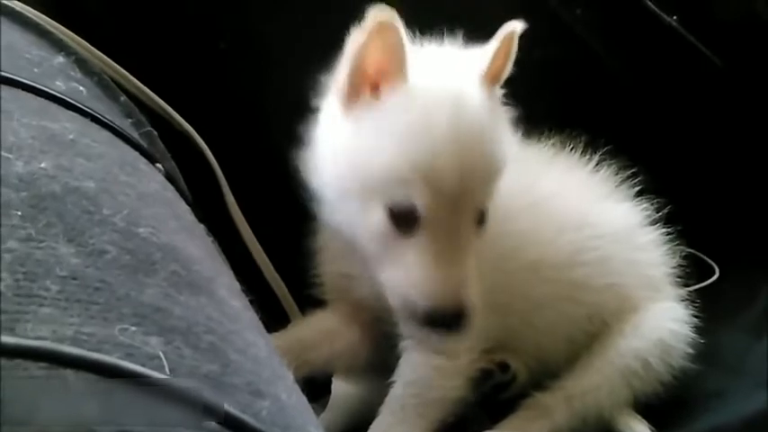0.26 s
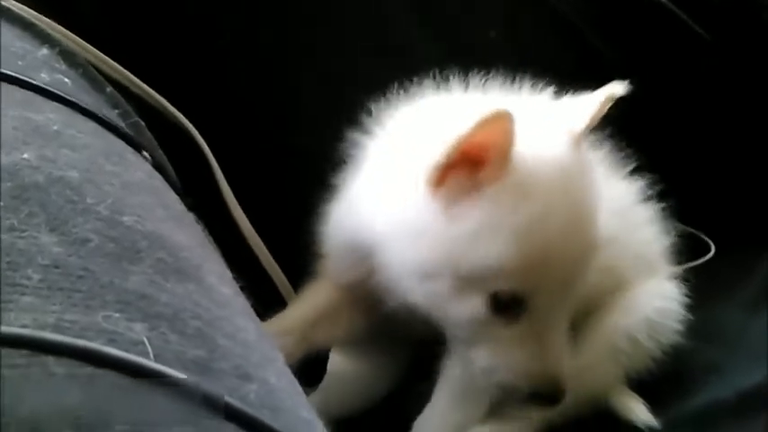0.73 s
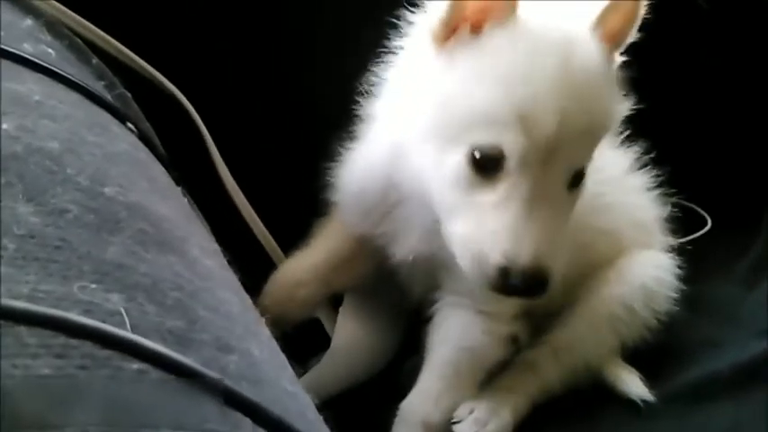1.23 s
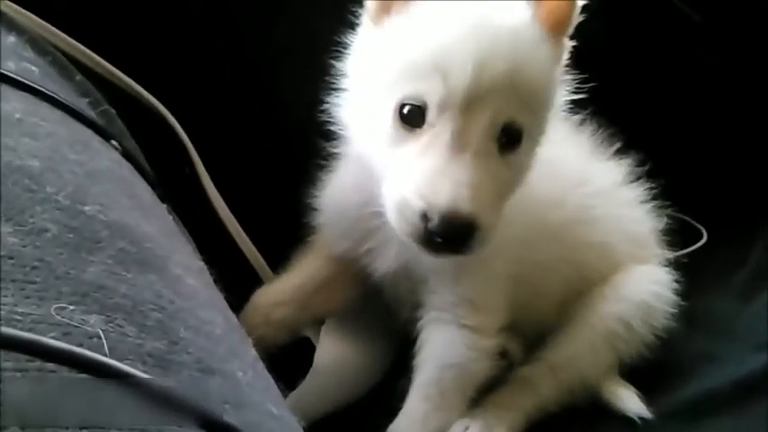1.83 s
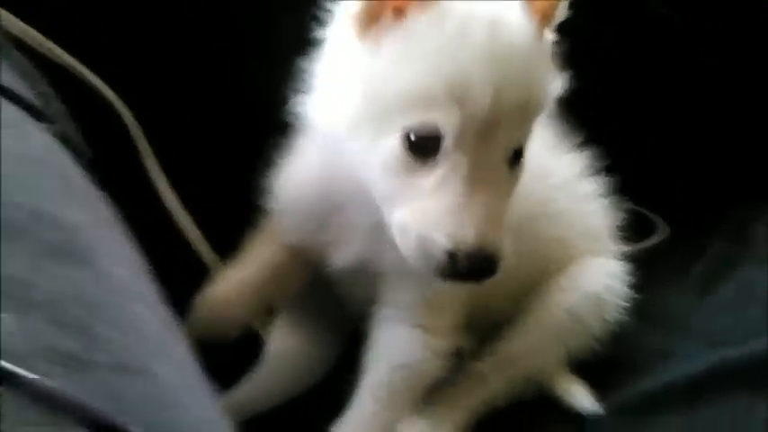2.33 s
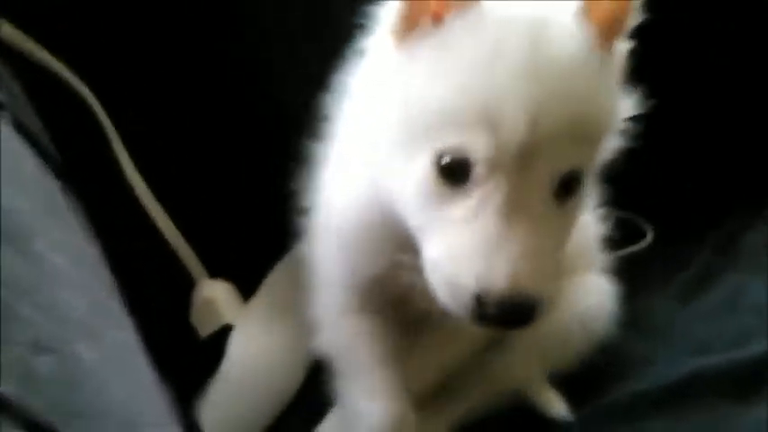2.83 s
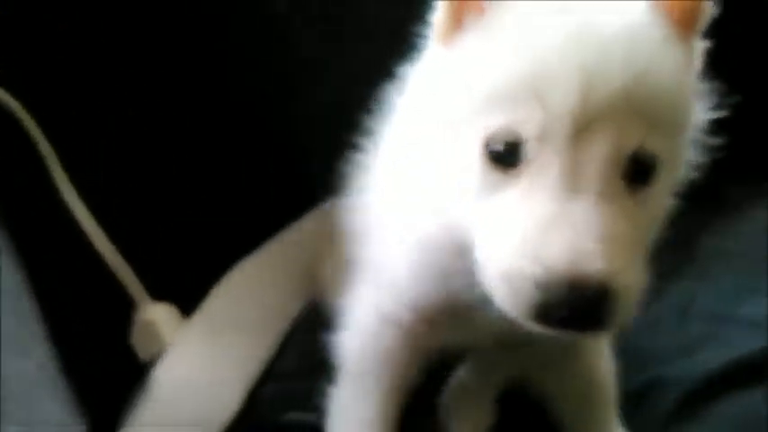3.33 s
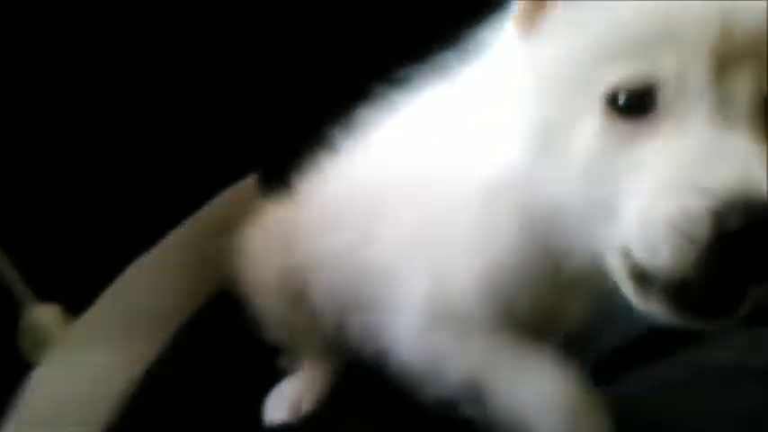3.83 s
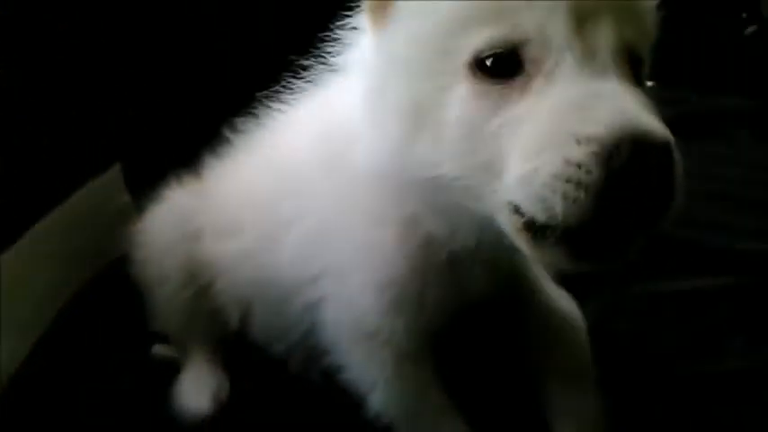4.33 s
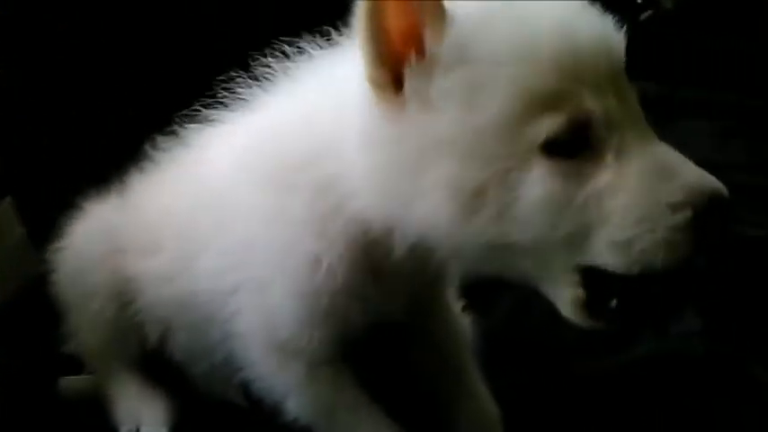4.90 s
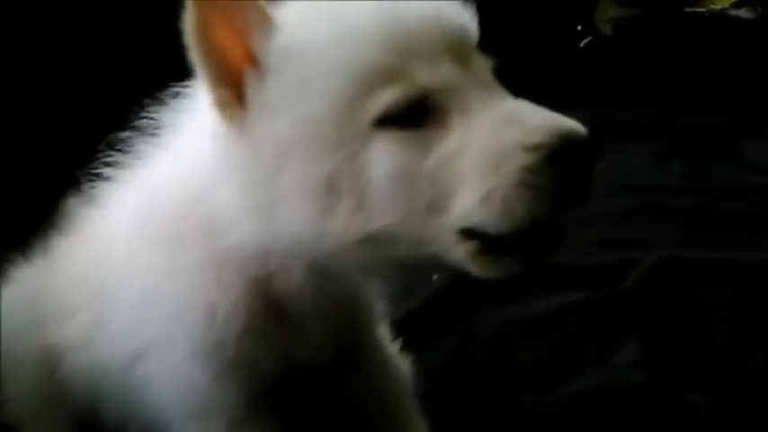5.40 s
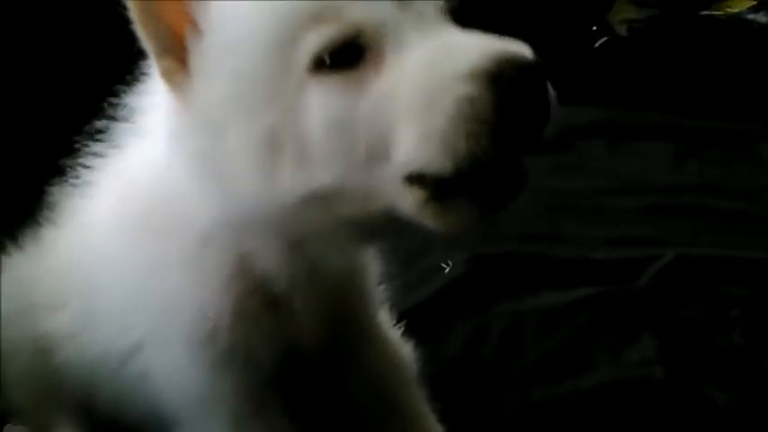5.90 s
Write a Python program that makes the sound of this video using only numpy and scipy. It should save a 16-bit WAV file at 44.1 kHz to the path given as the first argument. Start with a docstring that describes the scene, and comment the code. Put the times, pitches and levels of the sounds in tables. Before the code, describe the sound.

A wolf pup shuffles softly on cloth with small clicks, then gives one trembling call that leaps into a yelp and slides down as a howl.

```python
"""Wolf pup: shuffling, then a howl

A wolf pup shuffles about on cloth, close by in a quiet, dead-sounding space: tiny random slips make the rub,
short noise bursts the clicks and paw falls. Then comes one long call: a quivering hum through the nose,
an open-mouthed moan, a leap into a cracking yelp, and a clear howl that slides down as the mouth closes.
The voice is a stack of harmonics shaped by a moving throat, with a rasp of air at every pulse.
"""
import sys
import numpy as np
from scipy import signal
from scipy.fft import rfft, irfft, next_fast_len
from scipy.io import wavfile
from scipy.ndimage import uniform_filter1d, map_coordinates

SR = 44100
rng = np.random.default_rng(int(sys.argv[2]) if len(sys.argv) > 2 else 0)


def generate_wav(sig):
    """Save sig (samples, or channels by samples) to the path in sys.argv[1] as 16-bit PCM at SR."""
    pcm = np.round(np.clip(np.atleast_2d(sig).T, -1, 1) * 32767).astype(np.int16)
    wavfile.write(sys.argv[1], SR, pcm)


N = 271425
TIME = np.arange(N) / SR  # s
EDGE_HZ = 15550  # upper limit of the whole sound


def amp(db):
    """Turns decibels into a gain."""
    return 10 ** (np.asarray(db) / 20)


def unit(x):
    """Scales a sound to an average (rms) level of 1."""
    return x / np.sqrt(np.mean(x ** 2) + 1e-20)


def curves(rows, t):
    """Reads the columns of a table at the times t, with straight lines between rows."""
    start_s, *columns = np.transpose(rows)
    return [np.interp(t, start_s, column) for column in columns]


def spectrum_db(points, hz):
    """Reads a spectrum with straight lines on a log-frequency axis."""
    f, db = np.transpose(points)
    return np.interp(np.log(hz + 1), np.log(f + 1), db)


def colour(x, points):
    """Weights a sound by a spectrum, at rms 1; only the differences between the dB values count."""
    size = next_fast_len(len(x))
    gain = amp(spectrum_db(points, np.fft.rfftfreq(size, 1 / SR)))
    return unit(irfft(rfft(x, size) * gain, size)[:len(x)])


def drift(count, hz):
    """Random wandering, hardly any of it much faster than hz, at rms 1."""
    size = next_fast_len(count)
    f = np.fft.rfftfreq(size, 1 / SR)
    return unit(irfft(rfft(rng.standard_normal(size)) * np.exp(-(f / hz) ** 2), size)[:count])


# Tone of the room's steady noise: pitch_hz, relative_db
ROOM_TONE = [(12, -54), (20, 2), (90, -10.5), (112, -11.5), (175, -1), (218, -8), (476, -12.5), (578, -14),
             (1040, -11), (3520, -31), (6310, -32.5), (7260, -31), (9060, -45), (12300, -28), (15400, -27)]
ROOM_DB = -50
DRONE_HZ, DRONE_DB = 175, -67


def room():
    """Low steady noise, plus a faint drone whose pitch and loudness waver at random."""
    drone_hz = DRONE_HZ + 4 * drift(N, 14.5)
    drone_swell = 1 + 0.56 * drift(N, 0.91)
    drone = unit(np.sin(2 * np.pi * np.cumsum(drone_hz) / SR) * drone_swell)
    hiss = colour(rng.standard_normal(N), ROOM_TONE)
    return amp(ROOM_DB) * hiss + amp(DRONE_DB) * drone


# Early echoes from the surfaces close around the pup: delay_s, level_db
ECHOES = [(.0042, -39), (.0085, -30)]


def reflections(x, wet_db=-32, t60=0.21):
    """Close, soft surroundings return early echoes and a faint, dull tail that falls 60 dB in t60 seconds."""
    t = np.arange(SR // 4) / SR
    tail_tone = [(200, -6), (1000, 17.0), (2200, -7), (4000, -33), (15000, -53)]  # pitch_hz, relative_db
    tail = colour(rng.standard_normal(len(t)), tail_tone)
    tail *= amp(-60 * t / t60) * (t > .003)
    tail /= np.linalg.norm(tail)
    early = sum(amp(db) * np.interp(TIME - delay_s, TIME, x) for delay_s, db in ECHOES)
    return early + amp(wet_db) * signal.oaconvolve(x, tail)[:N]


# Tone of the light swish: pitch_hz, relative_db
SWISH_TONE = [(2060, -67), (3500, -40), (4580, -30), (4800, -30), (6670, -9.5), (7270, -6.5), (8780, 1.5),
              (10100, -1.5), (13900, -28), (15000, -33)]
# Tone of the heavier scrape: pitch_hz, relative_db
SCRAPE_TONE = [(1200, -5.5), (2400, -14), (3600, -2.5), (5000, -1), (7000, -6.5), (11000, -39)]
# Fur and paws slide on cloth, one row a stroke: peak_s, swell_s, fade_s, swish_db, scrape_db
STROKES = [(.65, 0.1, 0.088, -44, -59), (.96, 0.077, 0.089, -31.5, -59), (1.21, 0.024, 0.057, -42, -61),
           (1.38, .13, .13, -47.5, -61.5), (1.55, 0.054, 0.066, -46, -62), (1.74, 0.11, 0.091, -46.5, -69),
           (1.92, 0.082, 0.18, -50, -73), (2.33, 0.069, 0.09, -46, -58.5), (2.51, 0.076, 0.042, -36, -56.5),
           (2.692, 0.04, 0.017, -30.5, -43.5), (2.76, 0.036, 0.023, -37, -48.5),
           (2.96, 0.21, 0.11, -46, -52), (3.53, 0.23, 0.11, -40, -45.5), (3.79, 0.081, 0.093, -48.5, -53.5)]
STROKE_SHAPE = 1.28  # between a pointed (1) and a rounded (2) peak
REST_SWISH_DB, REST_SCRAPE_DB = -59.5, -66.5  # between strokes the fur never lies quite still


def rubbing(fibres_per_s=9000, uneven_db=0.78, catches_per_s=6, catch_size=9):
    """Thousands of tiny fibre slips a second under each stroke; now and then a fibre catches and ticks."""
    swish, scrape = amp(REST_SWISH_DB), amp(REST_SCRAPE_DB)
    for peak_s, swell_s, fade_s, swish_db, scrape_db in STROKES:
        width_s = np.where(TIME < peak_s, swell_s, fade_s)
        speed = np.exp(-(abs(TIME - peak_s) / width_s) ** STROKE_SHAPE)
        # noises add by power, not by height
        swish = np.hypot(swish, amp(swish_db) * speed)
        scrape = np.hypot(scrape, amp(scrape_db) * speed)
    slips = rng.standard_normal(N) * (rng.random(N) < fibres_per_s / SR)
    slips += catch_size * rng.random(N) * (rng.random(N) < catches_per_s / SR)
    # the rubbing fades to nothing early in the call
    pressure = amp(uneven_db * drift(N, 60)) * np.interp(TIME, [3.8, 3.95], [1, 0])
    return pressure * (colour(slips, SWISH_TONE) * swish + colour(slips, SCRAPE_TONE) * scrape)


def burst(start_s, db, t60, sound, rise):
    """A short contact with no ring: noise that rises fast and dies away by 60 dB in t60 seconds."""
    start = round(start_s * SR)
    age = np.arange(len(sound)) / SR
    out = np.zeros(N)
    out[start:start + len(sound)] = sound * amp(db - 60 * age / t60) * (1 - np.exp(-age / rise))
    return out


# Soft paw falls: start_s, level_db, decay_s
STEPS = [(1.31, -29.5, 0.051), (1.405, -43, 0.11), (2.822, -34.5, 0.063), (3.826, -38, .077)]
# Tone of a paw fall: pitch_hz, relative_db
STEP_TONE = [(30, -2), (120, -3), (250, -13), (500, -15), (1000, -25), (3000, -37)]


def paw_falls(size=6000):
    """Dull pats: soft pads start slowly and make mostly low noise."""
    out = np.zeros(N)
    for start_s, db, decay_s in STEPS:
        pat = colour(rng.standard_normal(size), STEP_TONE)
        out += burst(start_s, db, decay_s, pat, rise=0.0023)
    return out


# Sharp little clicks, of claws in the weave and of parting lips: start_s, level_db, decay_s, lowest_pitch_hz
CLICKS = [(.335, -40.5, 0.0091, 4000), (.361, -41, .013, 5000), (.869, -36, 0.01, 6000),
          (1.329, -37, 0.014, 8000), (1.349, -38, .015, 1500), (1.536, -40, 0.022, 2000),
          (1.931, -29.5, 0.014, 8140), (2.68, -16.5, 0.012, 2500), (2.703, -21.5, .032, 2000),
          (2.75, -29, .037, 5000), (2.794, -17, 0.0068, 3000), (2.797, -18.5, 0.017, 3000),
          (3.011, -31, .01, 8550), (3.782, -24, 0.0063, 7065), (3.824, -28, 0.019, 2486),
          (3.834, -25, 0.013, 1500), (3.901, -20, 0.015, 5900), (4.813, -14.5, 0.011, 7600)]
# Tone of a click before its lows are cut: pitch_hz, relative_db
CLICK_TONE = [(880, -43), (1500, -6), (2100, -20), (2450, -17), (3340, -15), (4590, -6.5), (5560, -10),
              (8830, 1.5), (11200, -6.5), (15000, -41)]


def clicks(size=6000):
    """Quick noise bursts; the higher the low cut, the thinner the click."""
    out = np.zeros(N)
    for start_s, db, decay_s, lowest_hz in CLICKS:
        b, a = signal.butter(3, lowest_hz, "high", fs=SR)
        thin = signal.lfilter(b, a, colour(rng.standard_normal(size), CLICK_TONE))
        out += burst(start_s, db, decay_s, unit(thin), rise=0.00019)
    return out


# Faint high squeaks: peak_s, pitch_hz, level_db
SQUEAKS = [(.143, 6500, -51), (1.872, 6900, -49.5), (3.085, 8260, -45)]


def squeaks(length=0.016, waver_hz=350):
    """Brief thin whistles: sine tones of unsteady pitch that swell and fade."""
    out = np.zeros(N)
    for peak_s, hz, db in SQUEAKS:
        turns = np.cumsum(hz + waver_hz * drift(N, 300)) / SR
        swell = np.exp(-((TIME - peak_s) / length) ** 2)
        out += amp(db) * swell * unit(np.sin(2 * np.pi * turns))
    return out


# Puffs of air as the mouth springs open: peak_s, level_db, length_s
PUFFS = [(3.94, -26.5, 0.02), (4.022, -47, 0.069), (4.875, -32, 0.021)]
# Tone of a puff: pitch_hz, relative_db
PUFF_TONE = [(100, -60), (600, -15), (1800, -18), (3000, 0.5), (4200, -10.5), (5500, 7), (6400, -12),
             (8000, -2), (10000, -28), (15000, -19)]


def puffs():
    """Air rushes out as the mouth opens: noise that swells and fades."""
    flow = sum(amp(db) * np.exp(-((TIME - peak_s) / length_s) ** 2) for peak_s, db, length_s in PUFFS)
    return flow * colour(rng.standard_normal(N), PUFF_TONE)


# One row for each mouth posture: move_start_s, move_time_s, pitch_jitter_share, flutter_share,
# rasp_db (against the voice), snap_db (extra treble). Jitter, flutter and snap are the values before effort
# and tremor add to them. Rows: nose, gape, open, yelp, wide, round, closing.
POSTURES = [(3.3, .03, 0.0043, 0.26, -30.5, 5), (3.888, 0.017, 0.0041, 0.38, -17.5, 4.5),
            (3.99, 0.25, 0.0025, 0.14, -13.5, 29), (4.848, 0.0098, 0.0035, 0.1, -31, -4.5),
            (5.05, 0.045, 0.0022, 0.082, -34, -2.5), (5.29, 0.16, 0.0022, 0.078, -33, 4.5),
            (5.788, 0.14, 0.0024, 0.085, -28, 1)]


def posture(t):
    """Place in the list of postures: each move of the mouth carries it on to the next one."""
    return sum(np.clip((t - start_s) / taken_s, 0, 1) for start_s, taken_s, *_ in POSTURES[1:])


def throat_response(points, size=4096):
    """Log gain and causal phase of one posture, so that each pulse rings after it strikes."""
    log_gain = np.log(amp(spectrum_db(points, abs(np.fft.fftfreq(size, 1 / SR)))))
    return np.conj(signal.hilbert(log_gain))[:size // 2]


# What the throat passes in each posture: pitch_hz, relative_db
NOSE = [(250, 0), (510, 3), (760, -5), (1000, -18), (1300, -45), (2200, -43), (8000, -51), (13000, -39.5),
        (15500, -35)]
GAPE = [(250, -0.5), (550, -3.5), (830, 5.5), (1100, -3), (1350, -4), (1700, 7), (2000, -14.5), (2350, -12),
        (2700, -15), (3300, -33), (4300, -32), (5450, -15), (6400, -43), (8000, -20), (15000, -70)]
OPEN = [(240, -5.5), (440, -15), (540, -7), (700, -6), (880, 4), (1100, -6), (1350, -6.5), (1630, 2),
        (1900, -16.5), (2250, -12), (2800, -50.5), (3800, -46.5), (7800, -67), (15000, -83)]
YELP = [(450, -19.5), (600, -15), (950, -0.5), (1250, -3.5), (1550, 5.5), (1850, -18), (2200, -6.5),
        (2600, -31), (3500, -43), (4400, -31.5), (5300, -42.5), (8000, -32), (15000, -94)]
WIDE = [(650, -17), (1250, -3), (1400, 4), (1900, -23), (2100, -21), (2700, -18.5), (3200, -45),
        (4150, -33.5), (5500, -53.5), (7500, -30.5), (8400, -30), (10000, -60), (11000, -44), (13300, -44),
        (15000, -54)]
ROUND = [(650, -6), (1280, 2), (1800, -20.5), (2000, -12), (2350, -6.5), (2620, -23), (3100, -40),
         (4000, -32), (4600, -19.5), (5500, -64), (7300, -29), (9600, -47.5), (11000, -36.5), (13200, -39),
         (14300, -50)]
CLOSING = [(450, -15.5), (550, -10.5), (920, -0.5), (1380, -8.5), (1600, -18), (1850, -9), (2300, -23.5),
           (2700, -42), (3300, -43.5), (4400, -30), (5300, -62), (7200, -50), (9000, -36), (15000, -43)]
THROATS = [NOSE, GAPE, OPEN, YELP, WIDE, ROUND, CLOSING]
# Tongue and lips shift all resonances together: start_s, pitch_factor
REACH = [(3.89, 0.93), (3.905, 0.864), (3.94, 1.02), (4.05, 0.998), (4.2, 1.01), (4.35, 0.98), (4.5, 0.995),
         (4.62, 1.01), (4.8, 1.005)]
FLUTTER_LEVEL = 0.66  # flutter moves the level of a harmonic less than its phase
THROB = 0.9  # share of the resonances' gain that shows in the loudness of the voice


def harmonics(t, pitch, turns, flutter, snap_db, flutter_hz=70, flutter_most=0.79, patchy_db=3.0,
              lead=1.1, size=32, count=64):
    """Pulses of the folds as harmonics weighted by the moving throat, evened to rms 1 over a tremor swing."""
    table = np.array([throat_response(p) for p in THROATS])
    # gains and phases change slowly, so work them out only every 32 samples
    slow_t, slow_pitch = t[::size], pitch[::size]
    mouth, (reach,) = posture(slow_t), curves(REACH, slow_t)
    out, power = np.zeros(len(t)), np.zeros(len(slow_t))
    for k in range(1, count):
        hz = k * slow_pitch
        place = [mouth, hz / reach / (SR / 2) * table.shape[1]]
        gain = np.exp(map_coordinates(table.real, place, order=1, mode="nearest")) * (hz < EDGE_HZ)
        lag = map_coordinates(table.imag, place, order=1, mode="nearest")
        # a harder snap of the folds brightens only the top
        gain *= amp(snap_db[::size] * np.clip((hz - 4000) / 3000, 0, 1))
        # the slow opening of the folds sends the bass ahead of each snap
        lag += lead * np.exp(-hz / 900)
        # high harmonics waver more than low ones, both slowly and fast
        slow, fast, skew = (drift(len(slow_t), rate * size) for rate in (12, flutter_hz, flutter_hz))
        unrest = np.minimum(flutter[::size] * hz / 1500, flutter_most)
        gain *= amp(patchy_db * np.minimum(hz / 5000, 1) * slow)
        gain *= 1.5 + FLUTTER_LEVEL * unrest * fast
        lag += unrest * skew
        angle = 2 * np.pi * k * turns + np.interp(t, slow_t, lag)
        out += np.interp(t, slow_t, gain) * np.cos(angle)
        power += gain ** 2 / 2
    # the voice throbs as the tremor sweeps its harmonics across the resonances
    power = uniform_filter1d(power, size=51) ** THROB * power ** (1 - THROB)
    return out / np.sqrt(np.interp(t, slow_t, power))


def waver(x, patchy_db=6.5):
    """Lets bands of a hiss swell and fade on their own, in patches about 700 Hz by 150 ms; rms 1."""
    z = signal.stft(x, nperseg=512)[2]
    patches = uniform_filter1d(rng.standard_normal(z.shape), size=8, axis=0)
    patches = unit(uniform_filter1d(patches, size=26, axis=1))
    return unit(signal.istft(z * amp(patchy_db * patches))[1][:len(x)])


# Tone of the air rasp: pitch_hz, relative_db
RASP_TONE = [(1880, -52), (3200, -41), (3710, -27), (4010, -19), (4660, 6.5), (5230, -12.5), (6110, 5.5),
             (7320, 3), (8010, 13.5), (9600, -5.5), (10800, 0), (11800, -13), (12700, -1), (13300, 5),
             (15000, -49)]


def air_rasp(turns, rasp_spread=0.19, rasp_floor=0.16, spurt_db=1.5):
    """Each opening of the folds lets through a spurt of air, some stronger than others; rms 1."""
    cycle = turns.astype(int)
    spurt = amp(spurt_db * np.clip(rng.standard_normal(len(turns)), -2, 2))[cycle]
    opening = rasp_floor + spurt * np.exp(-(turns % 1) / rasp_spread)
    return waver(colour(opening * rng.standard_normal(len(turns)), RASP_TONE))


# The quivering parts of the call: start_s, centre_pitch_hz, level_db, tremor_depth (share of the pitch).
# These are middle values: tremor, cracks and small random changes move them.
HUM = [(3.335, 407, -37, .02), (3.36, 386, -40, 0.015), (3.373, 267.7, -34.5, 0.036),
       (3.46, 245, -35, 0.034), (3.55, 261.4, -31.5, 0.035), (3.68, 263.3, -29.5, 0.016),
       (3.7, 246, -28.5, 0.034), (3.85, 245.2, -28.5, 0.047), (3.888, 257, -25, 0.027)]
MOAN = [(3.915, 268.3, -20, 0.027), (4.034, 282.5, -17.5, 0.046), (4.115, 257, -21.5, 0.046),
        (4.28, 255, -20.5, 0.062), (4.34, 223.7, -19, 0.011), (4.499, 229.3, -19.5, 0.06),
        (4.736, 231.4, -18, 0.042), (4.784, 295.6, -18, 0.042), (4.848, 319, -17, 0.0089)]
CRY = [(4.854, 504, -8.5, 0.056), (4.877, 516.4, -6, 0.048), (4.926, 558, -8.5, 0.037),
       (4.955, 505.4, -10.5, 0.13), (5.03, 530, -10, 0.14), (5.067, 569, -12, 0.1)]
YODEL = [(5.074, 637, -10.5, 0.047), (5.136, 646.6, -9, 0.045), (5.225, 687, -5, 0.024),
         (5.251, 665, -6.5, 0.05), (5.275, 703.5, -5.5, .003)]
# The clear howl has no tremor; its centre pitch: start_s, pitch_hz
HOWL_PITCH = [(5.295, 704.6), (5.505, 657), (5.559, 660.7), (5.729, 604.6), (5.751, 575), (5.785, 596),
              (5.833, 564), (5.861, 516), (5.925, 506), (5.983, 470.4), (6.039, 458), (6.055, 444),
              (6.083, 458), (6.14, 461)]
# Loudness of the howl: start_s, level_db
HOWL_LEVEL = [(5.295, -4), (5.383, -11), (5.797, -20), (5.985, -26), (6.14, -24)]
# the larynx trembles at a steady rate in each register; the high register opens on a crest
CREST_S, LOW_TREMOR_HZ, HIGH_TREMOR_HZ = 4.864, 25.5, 27.1
TREMOR_UNEVEN = 0.16  # share by which one swing differs from the next
CREST_POINT = 1.3  # the deeper the tremor, the more pointed its crests and the flatter its troughs
# the voice dips for an instant as it leaps between registers
LEAP_S, LEAP_DIP_DB, LEAP_LENGTH_S = 4.852, 7, 0.0035
# it cracks whenever the tremor drags the pitch more than GRIP (a share) under its centre
GRIP, CRACK_DB_PER_SHARE = 0.089, 79
# the harder the effort, the brighter the snap of the folds; at EASY_DB effort adds nothing
SNAP_DB_PER_DB, EASY_DB = 0.35, -18
SHAKE_PER_DEPTH = 25  # jitter and flutter grow with the depth of the tremor


def call(swell_db=10, shimmer=6.7, crack_jitter=0.0057, doubling=0.044, wander=.002, jitter_hz=380):
    """One unbroken call: quivering folds make the pitch, and a rasp of air rides on every pulse."""
    t = TIME[TIME > HUM[0][0]]
    quivering = np.vstack([HUM, MOAN, CRY, YODEL])
    centre, = curves(np.vstack([quivering[:, [0, 1]], HOWL_PITCH]), t)
    voice_db, = curves(np.vstack([quivering[:, [0, 2]], HOWL_LEVEL]), t)
    depth = np.interp(t, quivering[:, 0], quivering[:, 3], right=0)
    depth *= 1 + TREMOR_UNEVEN * drift(len(t), 16)
    mouth, settings = posture(t), np.transpose(POSTURES)[2:]
    jitter, flutter, rasp_db, snap_db = (np.interp(mouth, np.arange(len(POSTURES)), c) for c in settings)

    tremor_hz = np.where(t < CREST_S, LOW_TREMOR_HZ, HIGH_TREMOR_HZ)
    angle = 2 * np.pi * (t - CREST_S) * tremor_hz
    swing = depth * (np.cos(angle) + CREST_POINT * depth * np.cos(2 * angle))
    pitch = uniform_filter1d(centre * (1 + swing), size=110) * (1 + wander * drift(len(t), 25))

    # at a crack the folds lose their grip: softer, irregular, and with strong and weak pulses in turn
    crack_db = CRACK_DB_PER_SHARE * np.maximum(-swing - GRIP, 0)
    crack_db += LEAP_DIP_DB * np.exp(-((t - LEAP_S) / LEAP_LENGTH_S) ** 2)
    shake = 1 + SHAKE_PER_DEPTH * depth
    jitter = jitter * shake + crack_jitter * crack_db
    # count of fold cycles so far; its fraction is the place within a cycle
    turns = np.cumsum(pitch * (1 + jitter * drift(len(t), jitter_hz))) / SR

    effort_db = voice_db - EASY_DB
    voice = harmonics(t, pitch, turns, flutter * shake, snap_db + SNAP_DB_PER_DB * effort_db)
    voice *= 1 + shimmer * jitter * drift(len(t), 150)
    voice *= 1 + doubling * crack_db * np.cos(np.pi * turns)
    rasp = air_rasp(turns) * amp(rasp_db)
    level = amp(voice_db + swell_db * swing - crack_db)
    onset = np.clip((t - t[0]) / 0.0082, 0, 1)
    return np.pad(onset * level * (voice + rasp), (N - len(t), 0))


def scene():
    """The room, the pup moving on the cloth, and its voice with the echoes of the voice."""
    voice = call() + puffs()
    shuffling = rubbing() + paw_falls() + clicks()
    return (room() + reflections(voice) + shuffling + squeaks() + voice)[None]


def record(dry):
    """Flattens any peaks beyond full scale, then filters out everything above the upper limit."""
    low_pass = signal.firwin(511, EDGE_HZ, window=("kaiser", 9), fs=SR)
    return signal.oaconvolve(np.clip(dry, -1, 1), low_pass[None], "same")


dry = scene()
out = record(dry)
generate_wav(out)
```